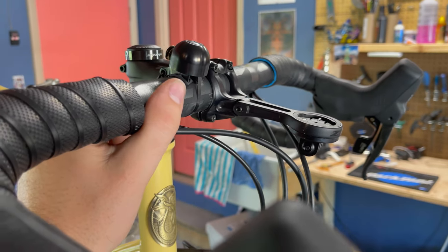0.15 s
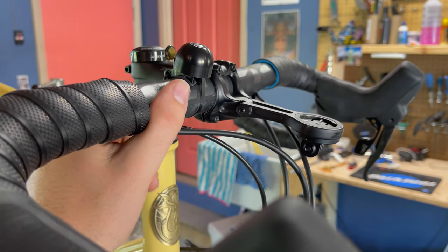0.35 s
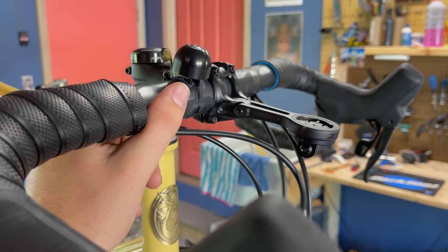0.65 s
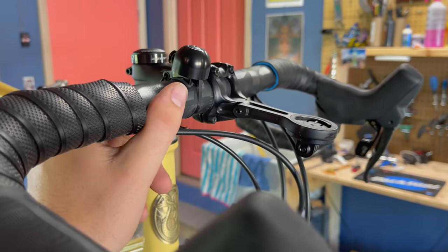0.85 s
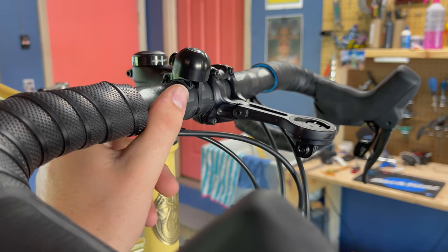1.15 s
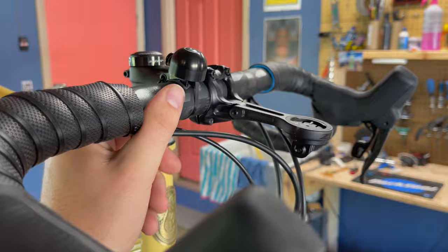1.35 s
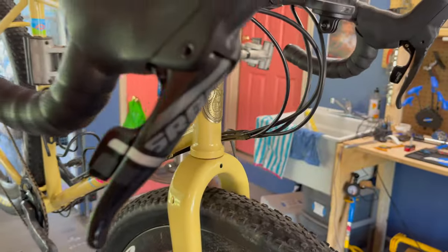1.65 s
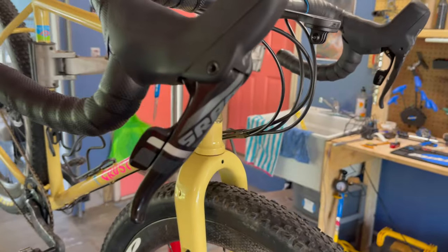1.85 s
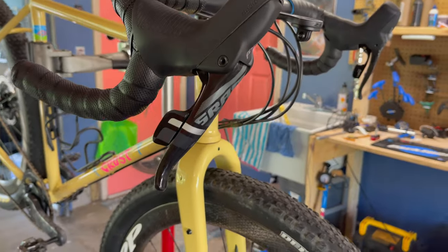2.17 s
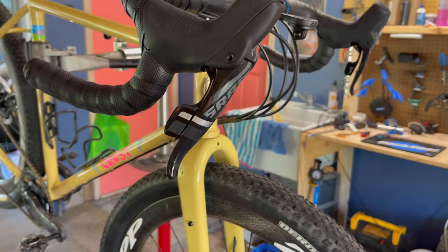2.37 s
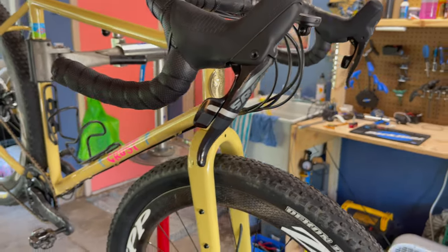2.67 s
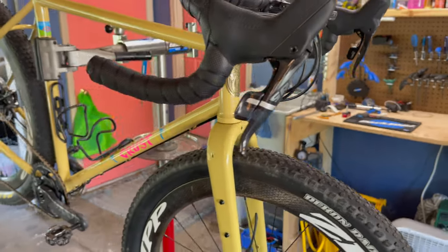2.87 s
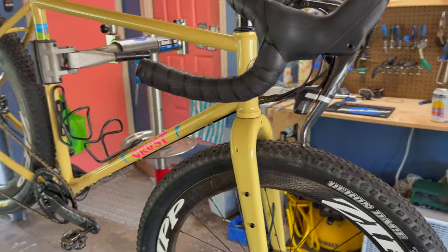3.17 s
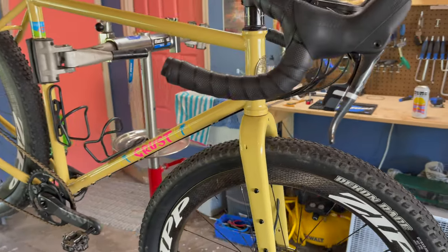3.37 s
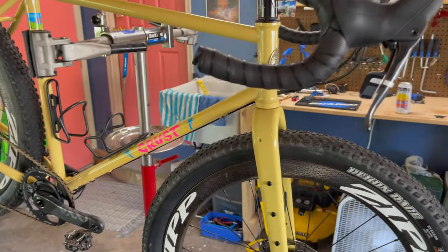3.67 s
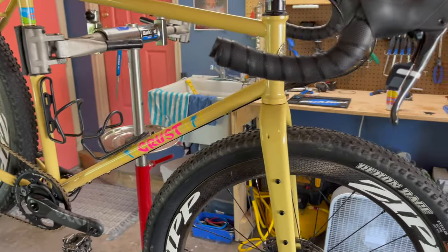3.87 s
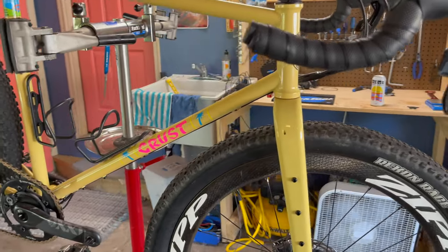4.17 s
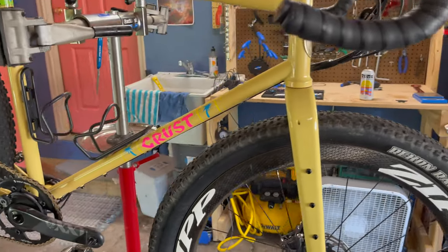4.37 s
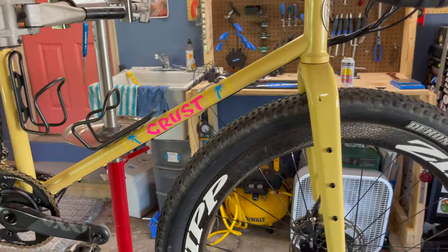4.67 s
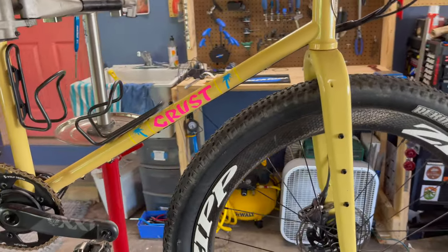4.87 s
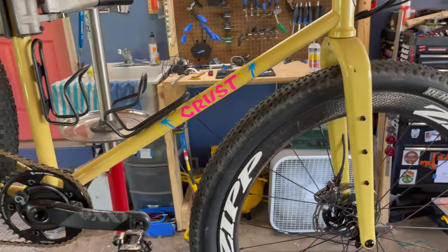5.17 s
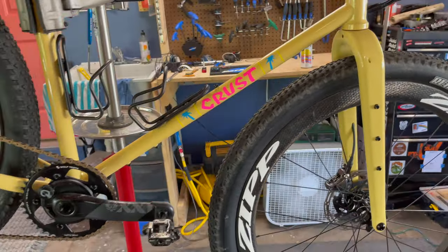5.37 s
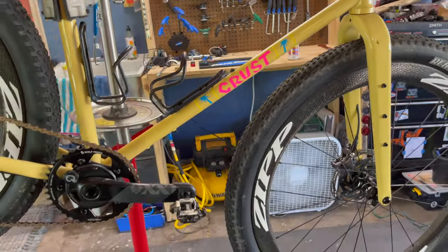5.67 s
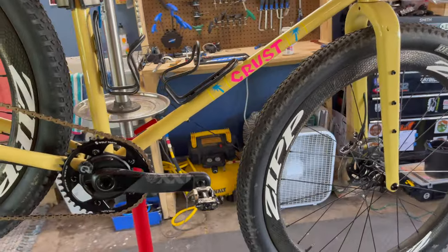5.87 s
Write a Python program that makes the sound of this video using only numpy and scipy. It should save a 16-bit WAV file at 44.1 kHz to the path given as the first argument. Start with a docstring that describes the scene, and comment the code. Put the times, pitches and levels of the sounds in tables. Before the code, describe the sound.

Handheld stereo phone pickup in a garage. Five bright, shimmering bell pings come about three per second, with clicky striker and clamp knocks and a short room reflection. Then a hard cut: no more bell, only the full, low rush and wavering hum of a box fan, gritty sole scrapes soon after the cut and once later, then soft low floor thumps.

```python
"""A small bicycle bell is struck five times close by: beating pairs of decaying sines form each ring,
with filtered noise and short modes for striker, lever and clamp, and the garage's answer behind.
The background of far fan noise and hum sinks under the ring. After a cut the phone has moved back:
a box fan drones as shaped noise with wavering blade tones, while shoes scuff and step on the floor."""
import sys
import numpy as np
from scipy import signal
from scipy.fft import rfft, irfft, next_fast_len
from scipy.io import wavfile
from scipy.ndimage import uniform_filter1d, map_coordinates

SR = 44100
rng = np.random.default_rng(int(sys.argv[2]) if len(sys.argv) > 2 else 0)


def persist_wave(psi):
    """Save psi, clipped to +-1, as 16-bit WAV."""
    counts = np.round(np.clip(psi, -1, 1) * 32767).astype(np.int16)
    wavfile.write(sys.argv[1], SR, np.atleast_2d(counts).T)


N = 265614
TIME_S = np.arange(N) / SR
CUT_S = 1.403  # from the close bell to the wide garage
ATTACK_S = .0003  # the blow takes this long to set the metal ringing
HALVES = np.array([[.5], [-.5]])  # splits a left-right difference over the two channels

# Bell dome, two close pairs of modes that beat: pitch_hz, level_in_pair_db, t60_s, left_right_db,
# left_lead_rad, lead_drift_rad_per_s (the phone turns), start_phase_rad
DOME_MODES = [(3821, 0, 9, 5.5, -2.6, .65, 0), (3842, 0, 9, -11, 1.2, -.9, 2.3),
              (10154, 0, 1.5, 0, 2.87, 0, 0), (10173.2, -11, 1.3, 0, 2.85, 0, .8)]
LOW_HZ, HIGH_HZ = DOME_MODES[0][0], DOME_MODES[2][0]
# The lever's pan, it sits to the right: pitch_hz, left_right_db
LEVER_PAN = [(1000, -2), (3000, -5.5), (5000, -6.5), (9000, -11.5)]
# Room noise beside the bell: pitch_hz, relative_level_db_per_hz
QUIET_SPECTRUM = [(18, -31), (30, -32), (78, -4.5), (286, -17), (420, -18.5), (564, -15), (623, -20),
                  (1390, -20.5), (3000, -27.5), (4700, -44), (6300, -37.5), (9110, -44), (12000, -75),
                  (15600, -115), (22000, -120)]


def amp(db):
    """Decibels to linear gain."""
    return 10 ** (np.asarray(db) / 20)


def unit(x):
    """Scale to an rms of 1."""
    return x / np.sqrt(np.mean(x ** 2) + 1e-20)


def along(points, hz):
    """Read (Hz, value) points along a log frequency axis."""
    f, v = np.transpose(points)
    return np.interp(np.log(hz + 1), np.log(f + 1), v)


def curves(rows):
    """One value per sample for each column after the time."""
    s, *cols = np.transpose(rows)
    return [np.interp(TIME_S, s, c) for c in cols]


def wobble(rate):
    """A smooth random curve with rate knots a second."""
    knots = rng.standard_normal(int(N * rate / SR) + 4)
    return map_coordinates(knots, [np.arange(N) * rate / SR])


def filtered(x, response):
    """Multiply the spectrum of x by a response of frequency."""
    m = next_fast_len(x.shape[-1] + 8192)
    spectrum = rfft(x, m) * response(np.fft.rfftfreq(m, 1 / SR))
    return irfft(spectrum, m)[..., :x.shape[-1]]


def shape(spectrum):
    """A gain over frequency from (Hz, dB) points."""
    return lambda hz: amp(along(spectrum, hz))


def band(hz, width):
    """A resonance whose gain halves at width / 2 to either side."""
    return lambda f: 1 / (1 + (2 * (f - hz) / width) ** 2)


def fading(t, t60):
    """Exponential decay by 60 dB in t60 seconds."""
    return amp(-60 * t / t60)


def onset(t, rise):
    """A rounded rise from silence over about rise seconds."""
    return 1 - np.exp(-(t / rise) ** 2)


def rush(gain):
    """Stereo noise of rms 1: a mid and a side part mix by frequency, near mono in the bass."""
    # Likeness of the ports: pitch_hz, left_right_correlation
    likeness = [(30, .5), (60, 0.9), (130, 0.87), (290, 0.96), (640, 0.76), (1410, 0.45), (3100, 0.22),
                (6820, -0.3), (15000, -0.12)]
    # Stereo balance: pitch_hz, left_right_db
    balance = [(60, -4), (110, 2), (200, -3), (380, -1.5), (700, -1.5), (1290, 0.5), (2380, -1.5),
               (4400, 1.5), (8120, -0.5), (15000, 0.5)]
    left_lag_s = .0001

    def mid_side(hz):
        turn = np.arccos(np.clip(along(likeness, hz), -1, 1)) / 2
        return gain(hz) * [np.cos(turn), np.sin(turn)]

    def ports(hz):
        level = amp(np.outer([.5, -.5], along(balance, hz)))
        return level * np.exp(-1j * np.pi * np.outer([1, -1], hz) * left_lag_s)

    mid, side = filtered(rng.standard_normal((2, N)), mid_side)
    return unit(filtered(np.array([mid + side, mid - side]), ports))


def patchy(x, depth_db):
    """Random patches of gain, some hundred Hz wide and a twentieth of a second long."""
    z = signal.stft(x, nperseg=512)[2]
    field = rng.standard_normal(z.shape[1:])
    field = uniform_filter1d(field, size=4, axis=0)
    field = uniform_filter1d(field, size=10, axis=1)
    return unit(signal.istft(z * amp(depth_db * unit(field)), nperseg=512)[1][:, :N])


def room():
    """The distant fan and a low hum beside the handlebar, sinking in level under the ring."""
    # Background level under the ring: time_s, bass_db, treble_db
    sinking = [(0, 5.5, 1), (.078, 7, 4), (.095, -17, -26), (.35, -15.5, -21), (.42, -15.5, -15),
               (.65, -6, -14), (.7, -12.5, -10), (.97, -14, -22.5), (1.02, -15.5, -29), (1.4, -16, -14)]
    # Far blade tones, as narrow noise: pitch_hz, width_hz, level_db (before the sinking)
    far_tones = [(166.5, 12, -49.5), (332.4, 8.7, -59.5), (414.5, 12, -52)]
    bass_db, treble_db = curves(sinking)
    colour = shape(QUIET_SPECTRUM)
    lows = lambda hz: 1 / (1 + (hz / 1500) ** 2)
    tones = sum(amp(db) * rush(band(hz, width)) for hz, width, db in far_tones)
    hum = amp(-39) * np.sin(2 * np.pi * 71.7 * TIME_S)
    low_noise = amp(-43.5 + wobble(6.4)) * rush(lambda hz: colour(hz) * lows(hz))
    treble = amp(-48) * rush(lambda hz: colour(hz) * (1 - lows(hz)))
    return amp(bass_db) * (hum + tones + low_noise) + amp(treble_db) * treble


def faint_hiss():
    """A faint, unsteady hiss near 11 kHz: narrowed noise under a random level."""
    faint_hiss_db = -63 - 30 / (1 + np.exp(4 * wobble(14)))
    return amp(faint_hiss_db) * rush(lambda hz: band(11300, 2000)(hz) ** 8)


def airflow():
    """Fan air as noise layers: a patchy rush, a grille roar, and a hiss with two broad resonances."""
    # Rush of air: pitch_hz, relative_level_db_per_hz
    air = [(15, -48), (25, -49), (60, -3.5), (81, -7.5), (118, -10.5), (161, -3), (210, -10), (275, -15.5),
           (331, -7.5), (471, -15), (579, -19), (758, -13), (1190, -17), (1840, -20), (3500, -30.5),
           (4550, -67), (7700, -120)]
    # Treble of the air: pitch_hz, relative_level_db_per_hz
    air_treble = [(2000, -11.5), (2800, -7), (3800, -4.5), (4600, -6.5), (5350, -9.5), (5900, -6.5),
                  (6700, -6.5), (7250, -12), (8000, -11.5), (9650, -13.5), (9900, -86), (10500, -120)]
    # Layer levels: time_s, rush_db, grille_roar_db, near_2400_hz_db, hiss_db, near_4000_hz_db
    layers = [(1.4, -30.5, -50, -47, -44.5, -60), (2.2, -29.5, -56, -48.5, -44.5, -73),
              (3, -29.5, -42.5, -54, -45.5, -63), (3.8, -29.5, -46, -58, -45, -53),
              (4.4, -30, -40, -57, -45, -52), (5, -31, -37, -45.5, -43.5, -49.5),
              (6.03, -31, -39.5, -50, -45, -51.5)]
    rush_db, roar_db, bright_db, hiss_db, keen_db = curves(layers)
    body = amp(rush_db + .5 * wobble(8)) * patchy(rush(shape(air)), depth_db=1.6)
    hiss = amp(hiss_db + .67 * wobble(5.91)) * rush(shape(air_treble))
    hiss = hiss + amp(bright_db) * rush(band(2420, 960)) + amp(keen_db) * rush(band(4050, 1600))
    roar = amp(roar_db + .52 * wobble(7.2)) * rush(band(767, 284))
    # a band of the rush moves up as the phone turns
    moved = 1 / (1 + np.exp((4.46 - TIME_S) / .17))
    roar = roar + amp(-48.5) * (1 - moved) * rush(band(1454, 220))
    roar = roar + amp(-46.5) * moved * rush(band(1850, 600))
    draught = amp(-44.5) * unit(filtered(rng.standard_normal((2, N)), band(72, 40)))  # unrelated ports
    return body + hiss + roar + draught


def blade_tones():
    """Wavering sines at multiples of the blade rate, with narrow noise for the upper ones."""
    # Strong tones, before lift and fades: time_s, second_db, fourth_db
    strong = [(1.42, -32, -52), (1.44, -28, -39.5), (2.09, -27, -41), (2.14, -45, -29.5), (2.74, -29, -45),
              (2.84, -50, -39), (2.92, -31.5, -28), (3.02, -30.5, -48), (3.11, -29, -39),
              (3.32, -34.5, -44), (3.37, -32, -48), (3.44, -27.5, -32.5), (3.73, -38.5, -36),
              (3.8, -34.5, -51), (3.87, -34, -33.5), (4.05, -35.5, -41), (4.21, -46, -43), (4.25, -27, -52),
              (4.51, -36.5, -32.5), (4.56, -28, -65), (4.58, -28.5, -39.5), (4.95, -37, -42),
              (5.12, -28.5, -38.5), (5.25, -36.5, -38.5), (5.55, -37, -44), (5.66, -45, -43),
              (5.76, -27, -39), (5.98, -37.5, -40), (6.02, -44, -50)]
    # Upper tones: blade_multiple, width_hz, level_db
    overtones = [(3, 19, -45), (5, 23, -42), (9, 6, -49)]
    blade_hz, first_db, lift_db = 82.9, -35.5, 4.5
    fade_db, fades_per_s = 4, 14  # depth and pace of short random fades
    turns = np.cumsum(blade_hz * (1 + .01 * wobble(9))) / SR
    tones = 0
    for k, db, fades in zip((1, 2, 4), (first_db, *curves(strong)), (1, .3, .6)):
        level = amp(db + lift_db - fade_db * wobble(fades_per_s) ** 2 * fades)
        # the lowest tone differs most between the ports
        stray = .63 * wobble(11) + .11 / k * wobble(1.83) * [[1], [-1]]
        tones = tones + level * np.sin(2 * np.pi * k * turns + stray)
    upper = sum(amp(db) * rush(band(k * blade_hz, width)) for k, width, db in overtones)
    return tones * amp([[-1.2], [1.2]]) + upper


def whistle():
    """A faint whistle near 8 kHz, narrow noise that swells twice."""
    # Whistle swells: peak_s, level_db
    whistle_swells = [(2.9, -56.5), (4.05, -54)]
    level = 0
    for s, db in whistle_swells:
        span = np.where(TIME_S < s, .15, .65)  # seconds of rise, then of fall
        level = level + amp(db) * np.exp(-((TIME_S - s) / span) ** 2)
    return level * rush(band(7950, 260))


def fan():
    """The box fan joins airflow, blade tones and whistle."""
    return airflow() + blade_tones() + whistle()


def feet():
    """Soles scrape the concrete as noise bursts; heavy steps push the floor once as short low sines."""
    # Scuffs, before roughness: start_s, level_db, rise_s, t60_s
    scuffs = [(1.46, -38, 0.029, 0.25), (1.938, -32.5, 0.014, 0.42), (2.24, -38.5, 0.02, 0.26),
              (3.76, -38.5, 0.031, 0.65)]
    # Sole on concrete: pitch_hz, relative_level_db_per_hz
    sole = [(2500, -25), (4000, -9), (6000, 0), (7000, 0), (9600, -6), (10200, -30), (10900, -12),
            (12200, -16), (13200, -60), (14000, -120)]
    # Steps: start_s, level_db, pitch_hz
    steps = [(5.092, -19, 69), (5.189, -19.5, 91.5), (5.439, -16, 95)]
    scrape = pushes = 0
    for s, db, rise, t60 in scuffs:
        since = np.maximum(TIME_S - s, 0)
        scrape = scrape + amp(db) * fading(since, t60) * onset(since, rise)
    for s, db, hz in steps:
        since = TIME_S - s
        swell = np.exp(-((since - .015) / .0058) ** 2)
        pushes = pushes + amp(db) * swell * np.sin(2 * np.pi * hz * since)
    roughness = amp(.79 * wobble(200))
    return roughness * scrape * rush(shape(sole)) + pushes


def garage(x):
    """The room's answer: a noise tail whose frequencies each die at their own speed."""
    # Decay of the garage: pitch_hz, t60_s
    decay = [(500, .35), (3000, .35), (4500, .2), (5800, .4), (7500, .35), (8600, .05), (11000, .015)]
    hz, t, z = signal.stft(rng.standard_normal((2, SR // 2)), SR, nperseg=256)
    tail = signal.istft(z * fading(t, along(decay, hz)[:, None]), SR, nperseg=256)[1]
    late = np.pad(x, ((0, 0), (350, 0)))  # the answer starts 8 ms later
    return signal.fftconvolve(late, tail / np.linalg.norm(tail[0]), axes=1)[:, :N]


def burst(spectrum, t):
    """Shaped stereo noise of rms 1, as long as t."""
    return unit(filtered(rng.standard_normal((2, len(t))), shape(spectrum)))


def dome(s, u, levels_db, swells_db, lates_s):
    """Close mode pairs beat and decay; after some blows the level swells again while the ring lasts."""
    swell_s = .15
    sway_rad, sways_per_s = .007, 40  # the hand-held phone sways: left lead per kHz, pace
    ring = 0
    for i, (hz, share_db, t60, pan_db, lead, drift, start) in enumerate(DOME_MODES):
        pair = int(hz >= HIGH_HZ)
        # the low pair swings on through a blow, the high pair starts afresh; only the beat shifts
        base, run = (HIGH_HZ, u) if pair else (LOW_HZ, s + u)
        sway = sway_rad * hz / 1000 * wobble(sways_per_s)[:len(u)]
        phase = 2 * np.pi * (base * run + (hz - base) * (u - lates_s[pair])) + start
        phase = phase + HALVES * (lead + drift * (s + u) + sway)
        swell_db = swells_db[pair] * (1 - np.exp(-(u / swell_s) ** 3))
        level = amp(levels_db[i] + share_db + swell_db + HALVES * pan_db)
        ring = ring + level * fading(u, t60) * onset(u, ATTACK_S) * np.sin(phase)
    return ring


def striker(t, tick_db, contact_db):
    """Contact drives the strongest mode harder for a few ms, with a first sharp impact."""
    contact = np.sin(2 * np.pi * HIGH_HZ * t + HALVES * DOME_MODES[2][4]) / (1 + (t / .0062) ** 8)
    # first instant of contact: 9.5 kHz, 6.5 dB over the tick's setting
    impact = np.exp(-(t / .00025 - 1.5) ** 2) * np.sin(2 * np.pi * 9500 * t)
    return amp(contact_db) * onset(t, ATTACK_S) * contact + amp(tick_db + 6.5) * impact


def tick(t):
    """The striker's tick is a very short noise burst, mixed partly to mono."""
    # Tick: pitch_hz, relative_level_db_per_hz
    tick_spectrum = [(600, -28), (2000, -27), (5000, -27), (9000, 11), (12000, -0.5), (15500, -14),
                     (17000, -29)]
    snap = burst(tick_spectrum, t)
    return (snap + .6 * snap.sum(axis=0)) * fading(t, .012) * (1 - np.exp(-t / .00015))


def thud(t):
    """The handlebar's low push builds after the blow and dies at once."""
    return np.sin(2 * np.pi * 125 * t) * np.exp(-((t - .009) / .008) ** 2)


def clamp(t, dull_db, bright_db):
    """Damped lever and clamp modes vary at every blow; a blurred ring hangs on."""
    # Lever and clamp, before random spread: pitch_hz, level_db, t60_s, left_right_db
    mount = [(289, -10, 0.06, -3), (615, -22, 0.032, -6), (857, -20, 0.16, -4), (1024, -17, 0.058, -7),
             (1835, -16, 0.053, -8), (2166, -15, 0.072, -7), (2870, -8, 0.025, 4), (2850, -3, 0.049, -1),
             (2900, -14, 0.025, 0), (3750, -11, 0.081, -4), (4630, -6, 0.016, -7), (4760, 1, 0.019, -10),
             (5300, -7.5, 0.015, -11), (6230, -6, 0.023, -9), (6370, -1.5, 0.014, -13),
             (10760, 14.5, 0.019, -0.5)]
    # Blurred ring: pitch_hz, relative_level_db_per_hz
    linger_spectrum = [(2550, -40), (2820, 0), (2980, -2), (3250, -40)]
    modes = 0
    for hz, db, t60, pan_db in mount:
        group_db = dull_db if hz < 4000 else bright_db
        spread_db = rng.normal(0, 2.5, (2, 1)) + rng.normal(0, 3.1)
        level = amp(db + group_db + HALVES * pan_db + spread_db)
        tone = np.sin(2 * np.pi * hz * t + HALVES * hz / 3600)
        modes = modes + level * fading(t, t60) * onset(t, 4 / hz) * tone  # builds over 4 cycles
    linger = burst(linger_spectrum, t) * fading(t, .45) * (1 - np.exp(-t / .005))
    return modes + amp(dull_db - 29) * linger


def lever(t):
    """The lever touches in uneven noise bursts, then falls back on its stop with a clack."""
    # Rattle: pitch_hz, relative_level_db_per_hz
    rattle_spectrum = [(200, -15), (500, -23), (900, -9.5), (2000, -13), (3000, -14.5), (4700, 0),
                       (5500, -5), (6300, 4.5), (7800, -10), (8500, -9), (10000, -71)]
    # Clack on the stop: pitch_hz, relative_level_db_per_hz
    clack_spectrum = [(500, -29), (850, 0.5), (1300, -4.5), (2200, -2.5), (3000, -19)]
    bounces = amp(3.5 * wobble(370)[:len(t)])
    panned = filtered(burst(rattle_spectrum, t), lambda hz: amp(HALVES * along(LEVER_PAN, hz)))
    rattle = bounces * panned * fading(t, .12) / (1 + (t / .027) ** 7)
    back = np.maximum(t - .0025, 0)  # the clack comes 2.5 ms after the blow
    clack = amp(4 + HALVES * LEVER_PAN[0][1]) * burst(clack_spectrum, t)
    return rattle + clack * fading(back, .03) * (1 - np.exp(-back / ATTACK_S))


def bell():
    """Each blow restarts the dome and knocks striker, lever and clamp; the garage answers the knocks."""
    # Blows, levels as set before swells and spectra: start_s, tick_db, rattle_db, handlebar_thud_db,
    # lowest_mode_db, its_beating_partner_db, high_pair_db, striker_contact_db, low_swell_db,
    # high_swell_db, high_partner_extra_db, low_beat_delay_s, high_beat_delay_s, low_clamp_db, high_clamp_db
    strikes = [(.0716, -19, -37, -29, -37.5, -58.5, -15, -12, 2, 0, 1.5, 0, 0, -28, -22),
               (0.3633, -32, -36.5, -50, -39, -59, -26, -19.5, 8.5, 5, -4, -.003, -.014, -39, -32),
               (0.6657, -20.5, -33, -33, -33.5, -49, -16.5, -12, 0, 0, 2, 0, 0, -26, -27.5),
               (0.9786, -27, -35, -46, -33.5, -48.5, -12.5, -12.5, 0, 0, 0, .005, .003, -36, -27),
               (1.2637, -28, -35.5, -46, -33, -48.5, -14.5, -14, 0, 0, 1.5, 0, .007, -35, -29)]
    # Level of the room's answer: pitch_hz, level_db
    answer = [(500, -15), (2000, -13), (2600, -11), (2900, -18), (3300, -13.5), (4700, -16.5),
              (6200, -25.5), (7700, -18), (10000, -25), (12000, -60)]
    ring, knock = np.zeros((2, 2, N + SR))
    t = np.arange(SR // 4) / SR
    ends = [row[0] for row in strikes[1:]] + [CUT_S]
    for row, end in zip(strikes, ends):
        s, tick_db, rattle_db, thud_db, low_db, beat_db, high_db, contact_db = row[:8]
        low_swell_db, high_swell_db, partner_db, low_late, high_late, dull_db, bright_db = row[8:]
        a = round(s * SR)
        u = np.arange(round(end * SR) - a) / SR
        levels_db = (low_db, beat_db, high_db, high_db + partner_db)
        ring[:, a:a + len(u)] += dome(s, u, levels_db, (low_swell_db, high_swell_db), (low_late, high_late))
        ring[:, a:a + len(t)] += striker(t, tick_db, contact_db) + amp(thud_db) * thud(t)
        hit = amp(tick_db) * tick(t) + clamp(t, dull_db, bright_db) + amp(rattle_db) * lever(t)
        knock[:, a:a + len(t)] += hit
    ring, knock = ring[:, :N], knock[:, :N]
    return ring + knock + garage(filtered(knock, shape(answer)))


def scene():
    """The close bell, then a cut with a short fade-in to the wide garage."""
    close = np.clip((CUT_S - TIME_S) * 1000, 0, 1)
    wide = np.clip((TIME_S - CUT_S) / .011, 0, 1) ** 2
    return (bell() + room()) * close + (faint_hiss() + fan() + feet()) * wide


def record(dry):
    """The phone's microphone loses the deepest bass and keeps nothing above its band limit."""
    bass_cut_hz, top_hz = 29, 17100
    return filtered(dry, lambda hz: (hz < top_hz) * hz ** 2 / (hz ** 2 + bass_cut_hz ** 2))


dry = scene()
out = record(dry)
persist_wave(out)
```